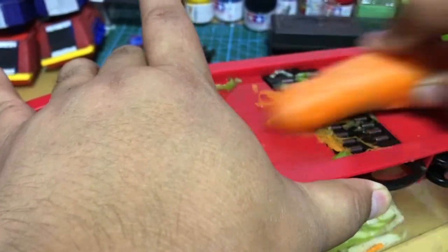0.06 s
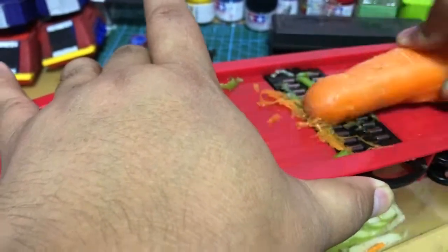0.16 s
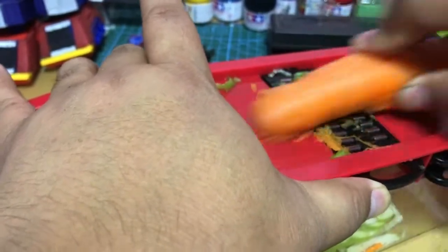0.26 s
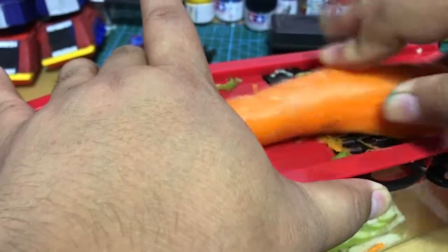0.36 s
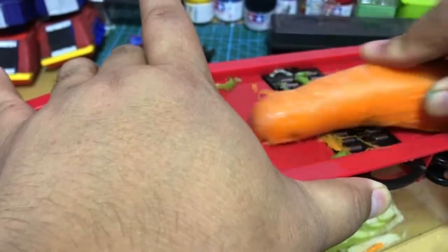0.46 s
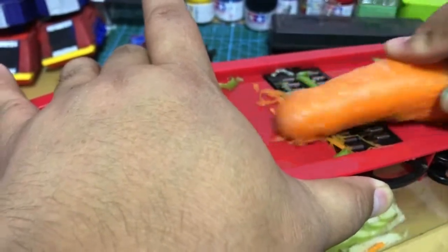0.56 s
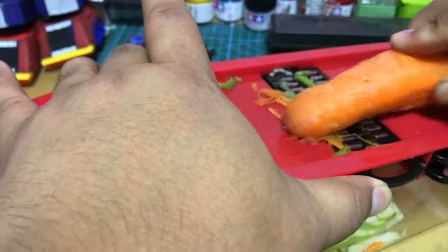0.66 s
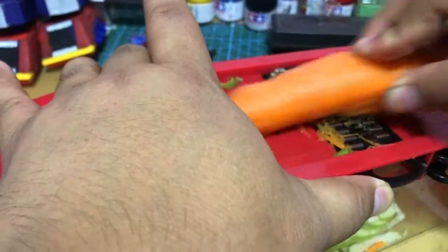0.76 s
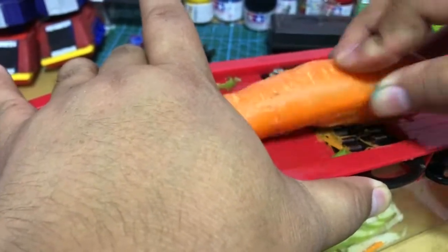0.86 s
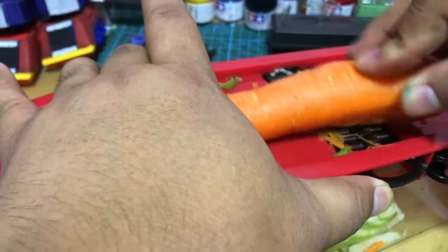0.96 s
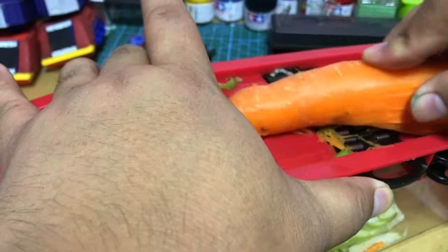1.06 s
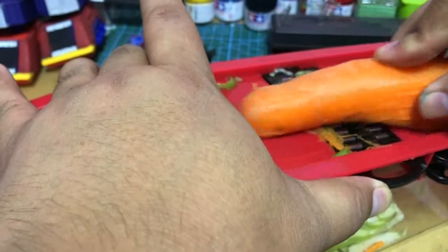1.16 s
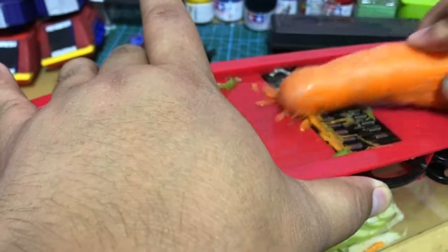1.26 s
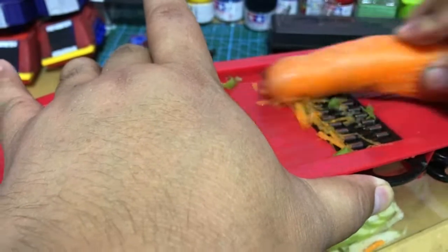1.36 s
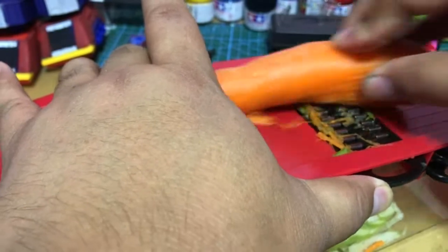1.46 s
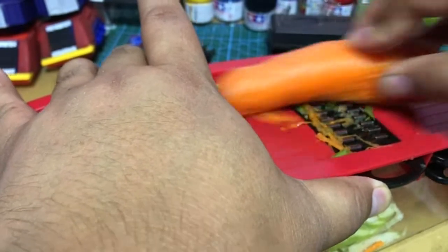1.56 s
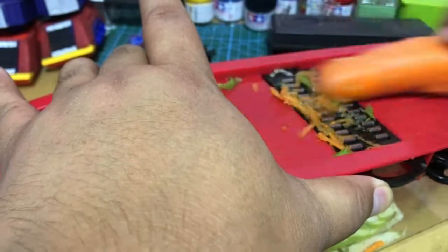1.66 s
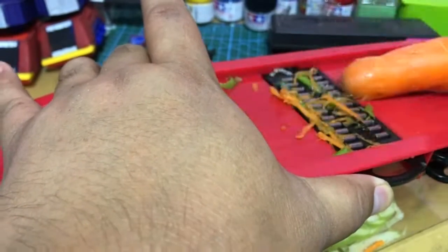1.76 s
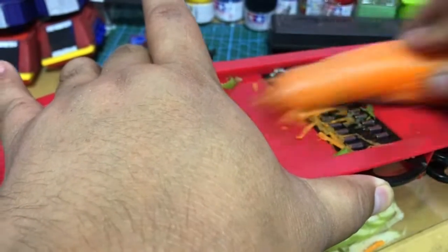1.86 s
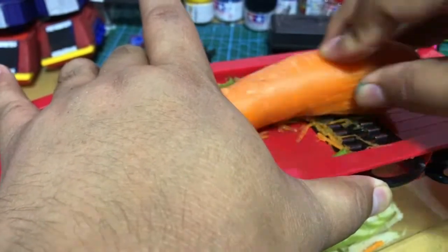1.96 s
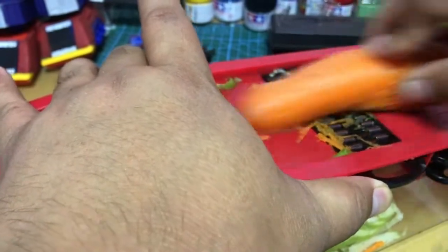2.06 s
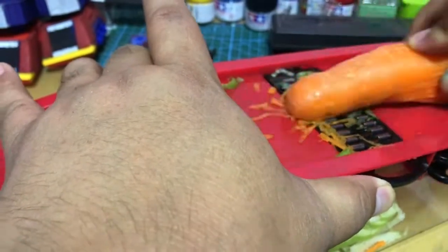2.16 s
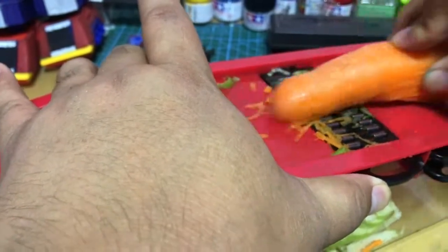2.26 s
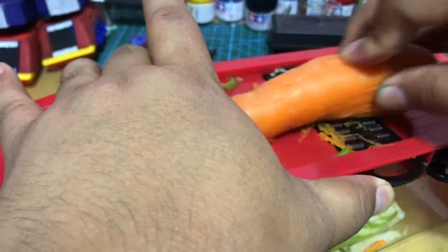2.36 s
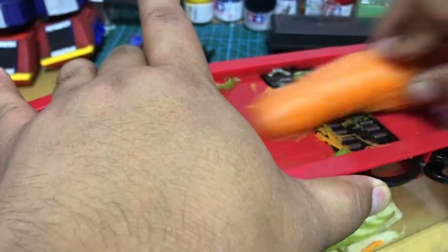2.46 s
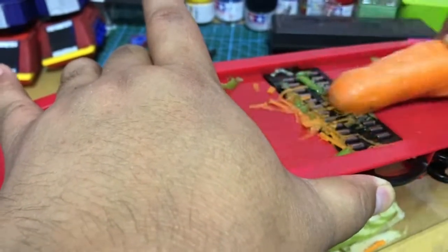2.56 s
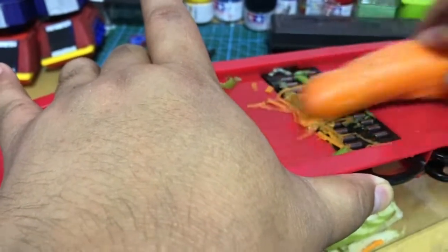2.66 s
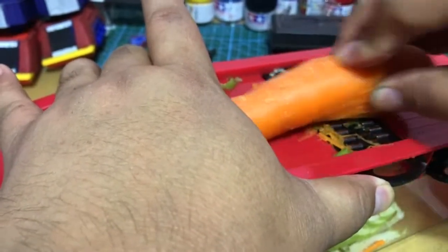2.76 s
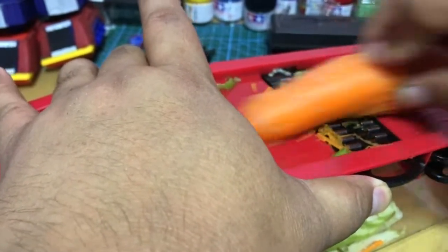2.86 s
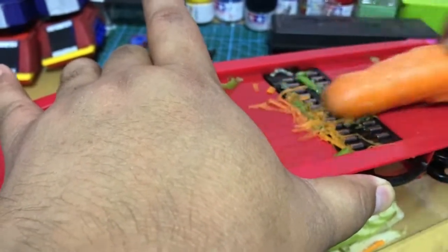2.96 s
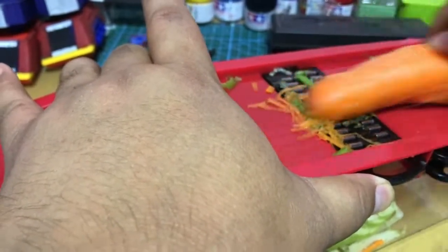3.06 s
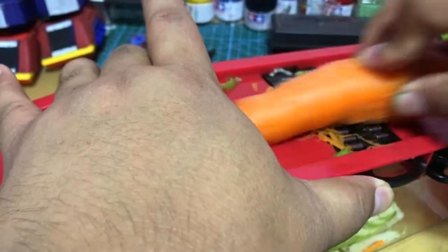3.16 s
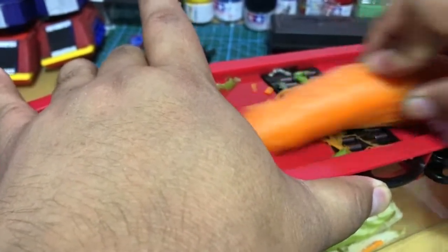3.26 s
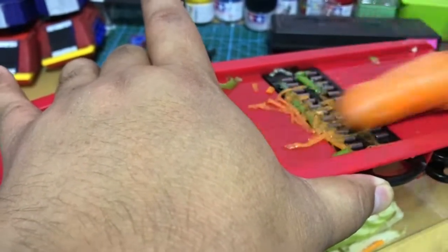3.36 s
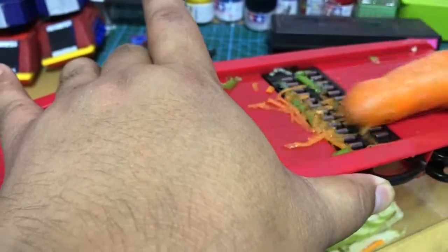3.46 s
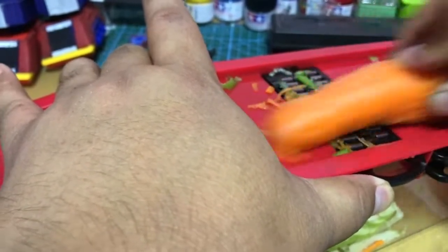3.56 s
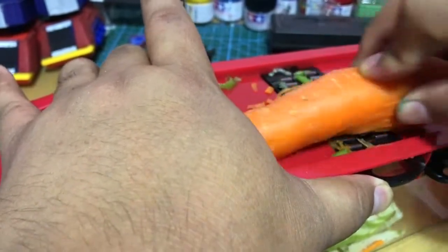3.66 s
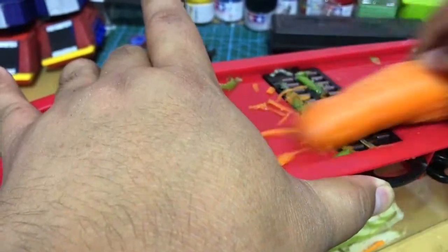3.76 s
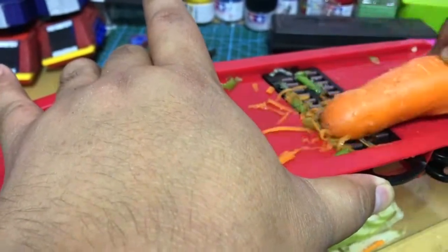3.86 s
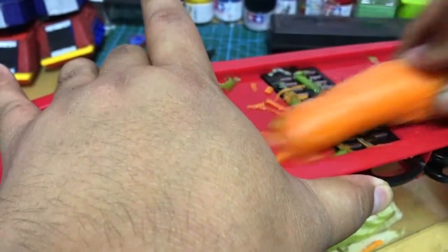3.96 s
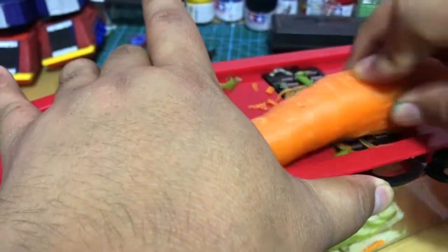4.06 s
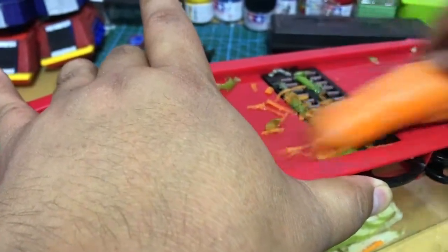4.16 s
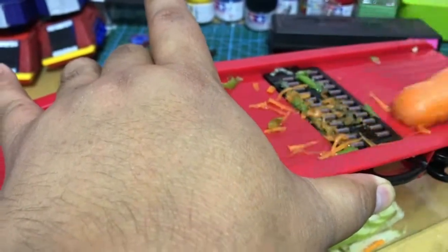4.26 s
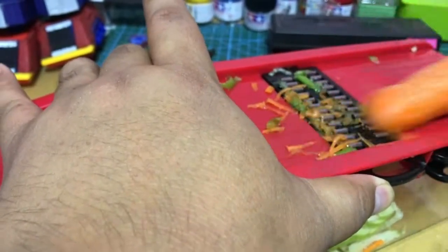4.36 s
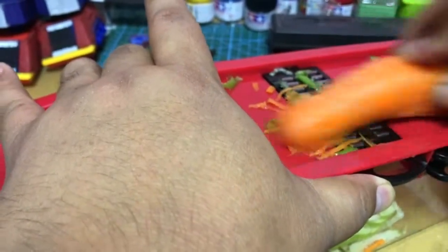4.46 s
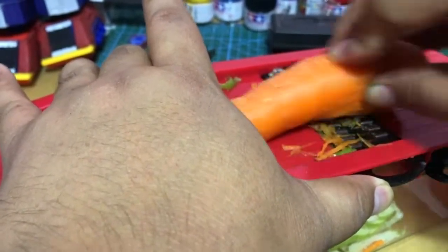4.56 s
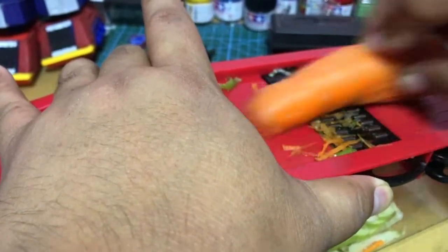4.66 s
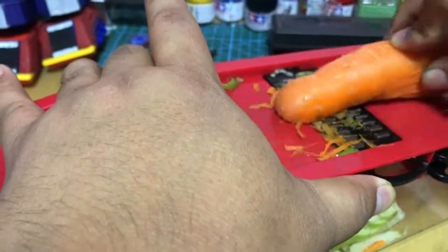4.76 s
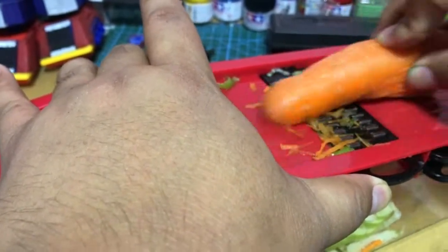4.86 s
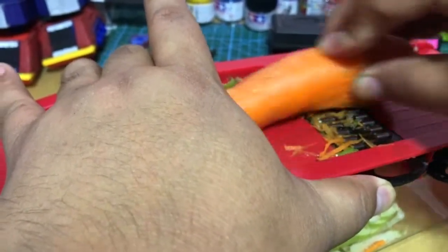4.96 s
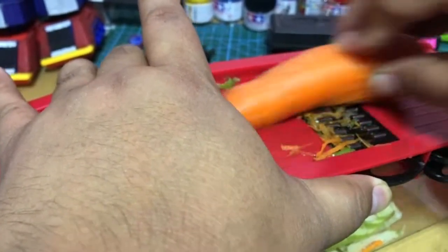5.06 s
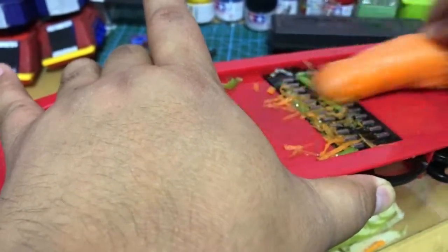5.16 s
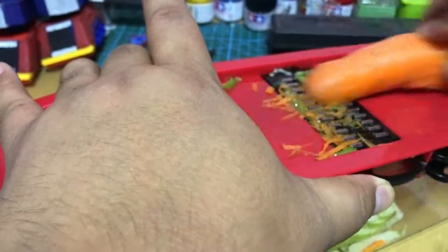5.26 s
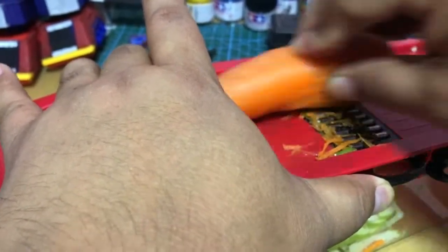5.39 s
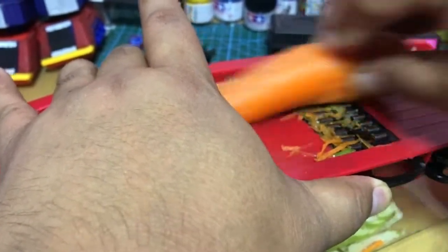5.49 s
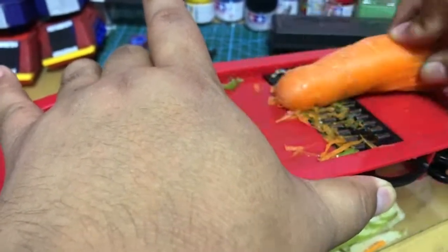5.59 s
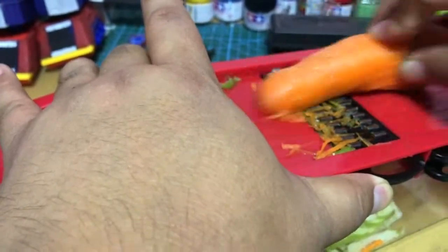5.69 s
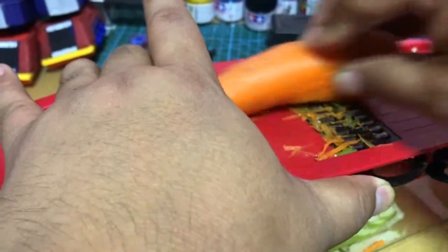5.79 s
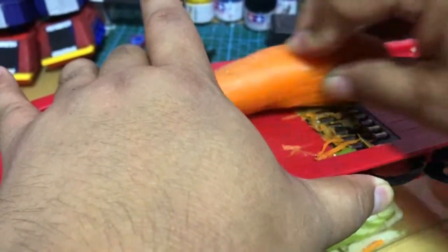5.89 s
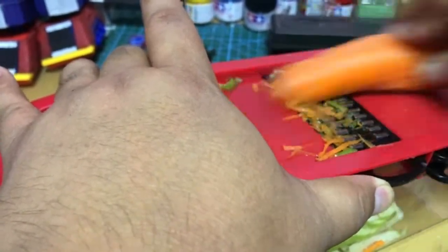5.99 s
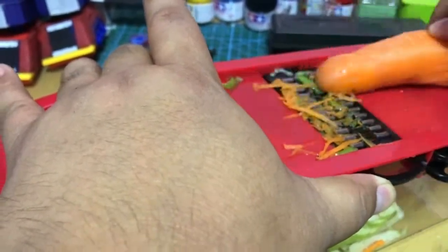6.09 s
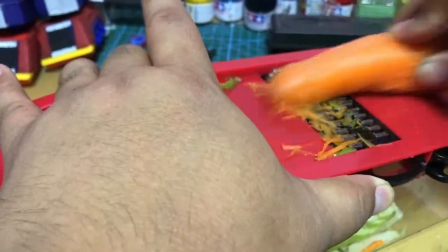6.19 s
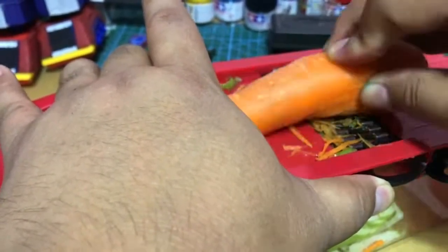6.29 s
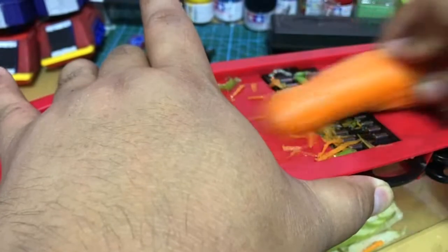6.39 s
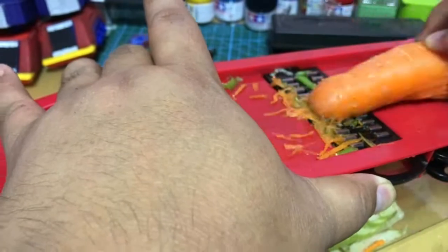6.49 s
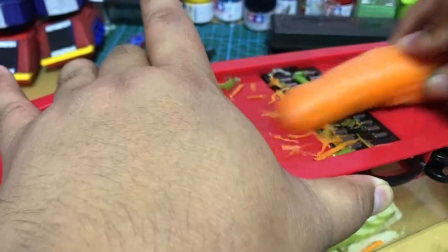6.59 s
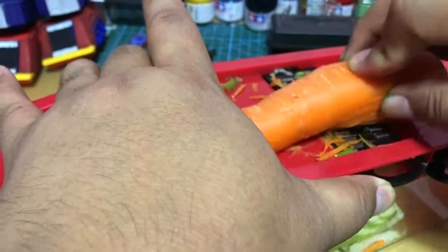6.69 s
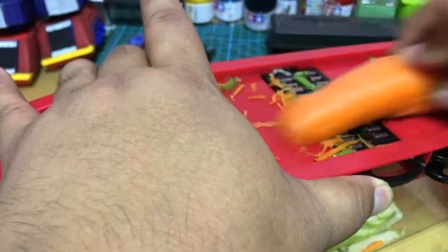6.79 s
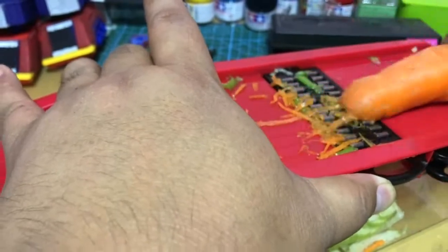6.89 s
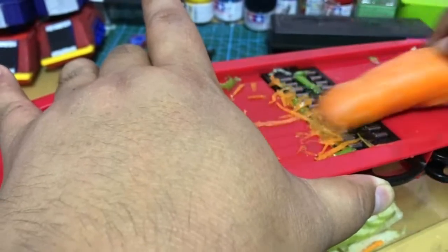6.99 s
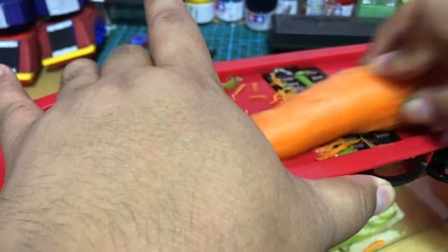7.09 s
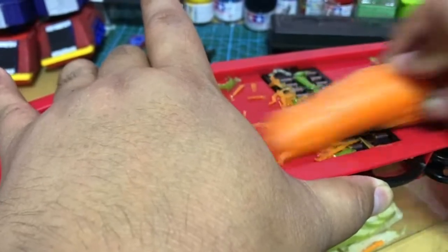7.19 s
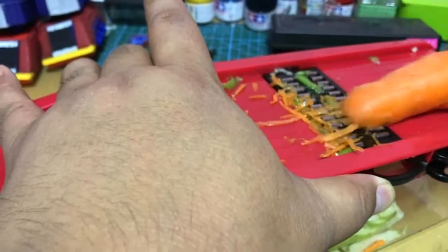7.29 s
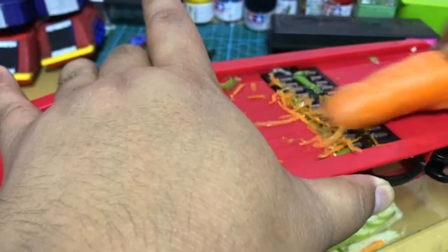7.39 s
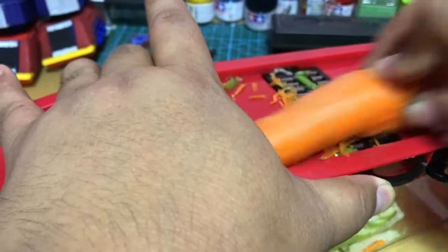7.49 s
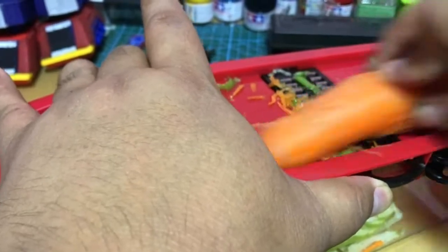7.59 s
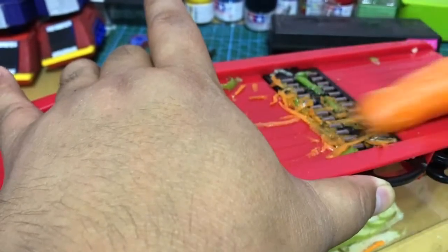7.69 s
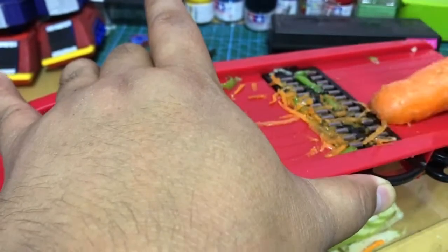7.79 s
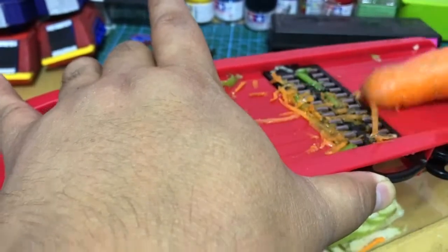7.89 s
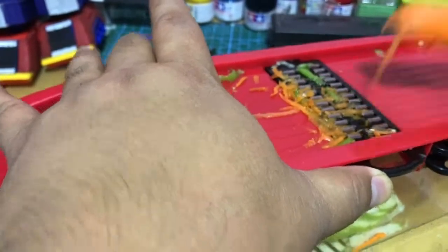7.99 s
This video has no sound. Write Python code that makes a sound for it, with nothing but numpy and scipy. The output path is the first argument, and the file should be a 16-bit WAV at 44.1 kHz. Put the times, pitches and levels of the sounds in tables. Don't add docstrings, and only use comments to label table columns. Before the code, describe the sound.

Close up in a small furnished room, a carrot shifts lightly on a plastic slicer board with small ticks and soft bumps. Then quick, regular grating begins, a little over two strokes a second: each forward stroke knocks, hisses and rasps through steel teeth, rattling the board, while lighter return strokes tick and the tray thumps. It ends with faint taps as the hand leaves.

```python
import sys
import numpy as np
from scipy import signal
from scipy.fft import rfft, irfft, next_fast_len
from scipy.io import wavfile
from scipy.ndimage import uniform_filter1d

SR = 44100
rng = np.random.default_rng(int(sys.argv[2]) if len(sys.argv) > 2 else 0)


def waveform_to_disk(signal):
    frames = np.transpose(np.atleast_2d(signal))
    scaled = np.clip(frames, -1, 1) * 32767
    samples = np.round(scaled).astype(np.int16)
    wavfile.write(sys.argv[1], SR, samples)


def gain_from_db(level_db):
    decades = np.asarray(level_db, float) / 20
    return 10 ** decades


N = 354563
TIME = np.arange(N) / SR


def unit(x):
    return x / np.sqrt(np.mean(x ** 2))


def shape(x, hz, db):
    size = next_fast_len(N)
    f = np.maximum(np.arange(size // 2 + 1) * SR / size, 1)
    gain = gain_from_db(np.interp(np.log(f), np.log(hz), db))
    return irfft(rfft(x, size) * gain, size)[..., :N]


def split(x, edge_hz):
    low = signal.sosfiltfilt(signal.butter(2, edge_hz, fs=SR, output="sos"), x)
    return low, x - low


def ring(x, modes, last=0.88):
    out = 0
    for k, (hz, db, t60) in enumerate(modes):
        pole = np.exp(2j * np.pi * hz / SR - np.log(1000) / (t60 * last * SR))
        out = out + (-1) ** k * gain_from_db(db) * signal.lfilter([1], [1, -pole], x).imag
    return out


def strike(events, modes, contact_s, last, vary_db):
    out = np.zeros(N + SR)
    blow = np.zeros(SR // 3)
    push = np.hanning(int(contact_s * SR) + 3)
    blow[:len(push)] = push / push.sum()
    places = rng.standard_normal((len(events), len(modes)))
    for (s, db, pitch), place in zip(events, places):
        woken = [(hz * pitch, g + vary_db * p, t60) for (hz, g, t60), p in zip(modes, place)]
        start = int(s * SR)
        out[start:start + len(blow)] += gain_from_db(db) * ring(blow, woken, last)
    return out[:N]


def grains(rate, spread_db, channels):
    hit = rng.random((channels, N)) < rate / SR
    size = gain_from_db(spread_db * rng.exponential(size=(channels, N)))
    return unit(hit * rng.standard_normal((channels, N)) * size)


def flutter(rate, depth_db):
    k = int(SR / rate)
    held = np.repeat(rng.standard_normal(N // k + 1), k)
    return gain_from_db(depth_db * uniform_filter1d(held, k)[:N])


def patchy(x, edges_hz, rate, depth_db):
    out = 0
    for edge_hz in edges_hz:
        low, x = split(x, edge_hz)
        out = out + low * flutter(rate, depth_db)
    return out + x * flutter(rate, depth_db)


def pair(x, apart=0, width=0):
    lag = int(0.00025 * SR)
    return np.array([x, np.roll(x, lag)]) + width * apart


# (frequency [Hz], left level [dB], right level [dB])
MIC_PORTS = [(877, 3.5, -1.5), (1510, -9, -8.5), (2540, -7.5, -11), (3180, -6, -8.5), (4830, -6, -12.5),
             (5850, -8, -11), (7170, -10.5, -7.5), (8100, -18.5, -11.5), (10300, -19.5, -7),
             (12300, -23.5, -11), (13850, -23.5, -14.5), (16000, -35.5, -19)]


def at_ports(x):
    hz, left_db, right_db = np.transpose(MIC_PORTS)
    return np.array([shape(x[0], hz, left_db), shape(x[1], hz, right_db)])


# (frequency [Hz], level [dB per Hz])
HUSH_SPECTRUM = [(24, -34), (40, -4), (202, -2), (342, -13), (509, -7), (838, -29), (949, -10), (1310, -37),
                 (15500, -35)]


def hush():
    return gain_from_db(-73) * unit(shape(rng.standard_normal((2, N)), *np.transpose(HUSH_SPECTRUM)))


def room(x):
    t60_s, top_t60_s, build_s, level_db = 0.3, 0.2, 0.011, -8.5
    age = TIME[:SR // 2]
    low, top = split(rng.standard_normal((2, len(age))), 13000)
    tail = low + top * gain_from_db(-60 * age / top_t60_s)
    tail = tail * gain_from_db(-60 * age / t60_s) * np.minimum(age / build_s, 1)
    tail = tail / np.sqrt(np.sum(tail ** 2, axis=1, keepdims=True))
    tail = split(tail, 150)[1]
    return gain_from_db(level_db) * signal.fftconvolve(x, tail, axes=1)[:, :N]


# (frequency [Hz], level [dB], decay t60 [s])
TRAY_MODES = [(108, 1.5, 0.24), (163.7, 0.5, 0.094), (86.3, -10, 0.46), (233, -7, 0.19),
              (308.6, -12.5, 0.34)]
# (time [s], peak level [dB], pitch [Hz])
TRAY_THUMPS = [(1.337, -38.5, 103), (1.387, -33.5, 117), (1.468, -34.5, 108), (1.549, -34, 101),
               (2.184, -39.5, 102), (2.37, -30, 112.4), (2.513, -39, 125), (2.93, -35.5, 151),
               (3.179, -38.5, 108), (3.871, -36, 95), (3.918, -35.5, 136), (4.045, -28.5, 110),
               (4.167, -35, 104), (4.238, -38.5, 103.4), (4.633, -36.5, 114), (4.732, -38, 141),
               (4.811, -36.5, 119), (5.016, -33, 111), (5.049, -30.5, 120), (5.184, -34, 124),
               (5.419, -41, 101.3), (5.462, -34.5, 116.3), (5.622, -35, 119), (5.912, -35.5, 114),
               (6.358, -38.5, 99.6), (6.675, -37.5, 109), (6.742, -37, 106.7), (7.07, -40, 107),
               (7.118, -32, 126.2), (7.177, -37, 108),
               (0.028, -32, 101), (0.26, -47, 108), (0.392, -35, 101), (0.469, -44, 97.5), (0.559, -51, 93),
               (0.614, -57, 95), (0.675, -38.5, 156.4), (0.833, -54, 87), (1.229, -45, 111),
               (1.71, -44.5, 104), (2.022, -42, 112.4), (2.726, -46, 108), (3.07, -37, 103),
               (3.495, -51.5, 95), (3.68, -46, 115), (3.759, -49.5, 102.5), (4.33, -38, 110),
               (6.026, -39, 127), (6.119, -40.5, 151), (6.54, -37, 100.4), (6.919, -55, 109),
               (7.409, -37, 124.7), (7.565, -52, 174), (7.718, -44, 171.6)]


def thumps():
    rows = [(s, db, hz / 110) for s, db, hz in TRAY_THUMPS]
    return pair(strike(rows, TRAY_MODES, contact_s=0.0047, last=0.77, vary_db=3.0))


# (frequency [Hz], level [dB], decay t60 [s])
BOARD_MODES = [(446.3, 2.5, 0.06), (512.8, -3.5, 0.14), (561, -1, 0.094), (665.3, -3.5, 0.11),
               (386, -5, 0.01), (756, -14.5, 0.13), (927, -2.5, 0.039), (1018, -9, 0.086),
               (1066, -7.5, 0.03), (1322, -11.5, 0.035)]
# (time [s], peak level [dB], hardness [dB], pitch [Hz])
BOARD_KNOCKS = [(0.252, -56, -16, 570), (0.399, -43, -11, 446), (0.469, -45, -11, 432),
                (0.692, -36.5, -9.5, 513), (0.895, -42, -17, 547), (1.063, -43.5, -44, 490),
                (1.211, -41.5, -24, 486), (1.389, -36, -9.5, 490), (1.697, -46.5, 0, 470),
                (1.744, -31.5, -16, 440), (1.987, -38, -34, 622), (2.58, -35, -8, 570),
                (3.452, -25, -28, 537), (3.918, -17, -8, 483), (3.944, -24, -21, 507),
                (4.121, -32.5, -15.5, 540), (4.364, -46, -27, 473), (4.284, -37.5, -11, 490),
                (4.514, -43.5, -26, 398), (5.187, -29, -13, 507), (5.432, -34, -19, 440),
                (5.647, -26, -17, 460), (5.924, -30, -17, 446), (6.347, -35, -36, 468),
                (7.326, -49, -2, 456), (7.57, -52, -22, 488), (7.66, -52, -41, 483), (7.719, -44, -10, 442),
                (7.765, -42.5, -36, 496), (7.956, -45.5, -17, 647)]


def knocks():
    landings = [(row[0], row[4], -18, 491) for row in CUT_STROKES]
    turns = [(row[0], row[4], -8.5, 482) for row in RETURN_STROKES]
    blows = BOARD_KNOCKS + landings + turns
    soft_rows = [(s, db, 1) for s, db, _, _ in blows]
    spot_rows = [(s, db, hz / 550) for s, db, _, hz in blows]
    hard_rows = [(s, db + hard_db, 1) for s, db, hard_db, _ in blows]
    soft = strike(soft_rows, BOARD_MODES[:5], contact_s=0.00052, last=1.0, vary_db=-1.5)
    spot = strike(spot_rows, [(563.0, 0.0044, 0.075)], contact_s=0.0014, last=1, vary_db=1.5)
    hard = strike(hard_rows, BOARD_MODES[5:], contact_s=0.0004, last=0.68, vary_db=5)
    return pair(gain_from_db(-14.5) * soft + gain_from_db(-3.0) * spot + gain_from_db(8.5) * hard)


# (frequency [Hz], level [dB], decay t60 [s])
TOOTH_MODES = [(2257, -10.5, 0.09), (2244, 1.5, 0.027), (3048, -10.5, 0.22), (4333, 6.5, 0.028),
               (4510, 0.5, 0.021), (5310, -1, 0.11), (7100, -10, 0.057), (7660, 5.5, 0.11),
               (9400, 1, 0.071), (9850, -5, 0.08), (12500, -1, 0.14)]
# (time [s], peak level [dB], top end level [dB])
FIBRE_TICKS = [(0.024, -38.5, -25), (0.113, -37, -13), (0.172, -36.5, -3), (0.3368, -48, -1.5),
               (0.5393, -49, 3.5), (0.608, -46.5, 4.5), (0.696, -40.5, -37), (0.873, -54, -16),
               (0.897, -42, -5), (1.208, -45.5, -13), (1.306, -37, 5.5), (1.458, -41.5, -6),
               (1.686, -40, -12.5), (1.9146, -39, -9), (2.551, -32.5, -24), (3.3333, -47, -16),
               (4.025, -40, -5), (5.887, -50, -2), (6.673, -50, -15), (7.672, -45, -14)]
# (time [s], peak level [dB])
SHRED_SNAGS = [(1.558, -36.5), (2.028, -48), (2.434, -40), (2.8592, -36), (3.371, -43.5), (3.686, -51),
               (4.082, -48.5), (5.071, -43), (5.475, -44.5), (5.9313, -39), (6.354, -46), (6.7344, -39.5),
               (7.145, -42)]


def ticks():
    decay_s, rise_s, ring_db = 0.012, 0.006, -33
    bite_db, bite_top_db, snag_top_db = 0.5, -15, 6
    out = np.zeros((2, N + SR))
    age = TIME[:SR // 6]
    envelope = np.exp(-age / decay_s) * np.minimum(age / rise_s, 1)
    bites = [(s, cut_db + swell_db(run_s) + bite_db, bite_top_db) for s, run_s, cut_db, _, _ in CUT_STROKES]
    snags = [(s, db, snag_top_db) for s, db in SHRED_SNAGS]
    for s, db, top_db in FIBRE_TICKS + bites + snags:
        low, high = split(rng.standard_normal((2, len(age))), 6500)
        struck = gain_from_db(db) * envelope * (low + gain_from_db(top_db) * high)
        chance = rng.standard_normal((len(TOOTH_MODES), 2))
        teeth = [(hz * (1 + 0.06 * a), g + 2.5 * b, t60)
                 for (hz, g, t60), (a, b) in zip(TOOTH_MODES, chance)]
        start = int(s * SR)
        out[:, start:start + len(age)] += struck + gain_from_db(ring_db) * ring(struck, teeth, last=0.3)
    return gain_from_db(10.5) * at_ports(split(out[:, :N], 1800)[1])


def swell_db(early_s):
    return -9 * (10 * early_s) ** 1.53


def arc(start_s, length_s, bend):
    grip_db, share, end_db = bend
    let_go_db_per_s = 395.5
    s = start_s + np.array([0, share * length_s, length_s, length_s + 1])
    return np.interp(TIME, s, [grip_db, 0, end_db, end_db - let_go_db_per_s])


# (landing time [s], run-up to the fastest point [s], cutting level [dB],
# board drag level [dB], landing knock level [dB])
CUT_STROKES = [(1.281, 0.07, -45.5, -42, -38), (1.733, 0.042, -42, -37, -43),
               (2.135, 0.072, -44, -39, -35.5), (2.516, 0.11, -44, -40, -38.5),
               (2.937, 0.094, -42, -38.5, -28), (3.394, 0.073, -43.5, -40, -37),
               (3.801, 0.075, -42, -38, -49.5), (4.31, 0.06, -42.5, -41, -44),
               (4.734, .08, -41.5, -35, -34), (5.134, 0.11, -41.5, -37, -46),
               (5.57, 0.12, -39.5, -36.5, -52), (6.051, 0.077, -42.5, -40, -38.5),
               (6.451, 0.065, -41, -38, -39), (6.874, 0.068, -40.5, -37, -50.5),
               (7.289, 0.076, -44, -39.5, -45)]
# (start time [s], length [s], cutting level [dB],
# board drag level [dB], turning knock level [dB])
RETURN_STROKES = [(1.467, 0.24, -52, -41, -45), (1.913, 0.22, -58, -46.5, -43),
                  (2.335, 0.16, -50, -43, -55), (2.743, 0.18, -52.5, -44, -55),
                  (3.167, 0.16, -58, -44.5, -53), (3.599, 0.18, -56.5, -45, -59),
                  (4.043, 0.25, -55, -42.5, -34), (4.579, 0.11, -54, -44.5, -57.5),
                  (4.95, 0.18, -50.5, -42.5, -43), (5.379, 0.19, -52, -44, -41),
                  (5.884, 0.11, -48.5, -40.5, -42), (6.248, 0.17, -53, -42, -59),
                  (6.671, 0.16, -55, -44.5, -45), (7.093, 0.14, -54.5, -41, -57)]
# (start time [s], length [s], cutting level [dB],
# board drag level [dB], brightness [dB])
CARROT_SHIFTS = [(0, 0.14, -52.5, -44, -11), (0.105, 0.21, -53.5, -48, -7.5), (0.377, .08, -64.5, -53, -10),
                 (0.533, 0.11, -60.5, -63.5, -19), (.685, 0.072, -57.5, -47, -14),
                 (0.873, 0.13, -68.5, -55, -1.5), (1.057, 0.19, -79.5, -61.5, 3),
                 (1.203, 0.17, -60.5, -56, -5), (7.484, 0.11, -77, -66, 0), (7.684, 0.1, -67.5, -65, -7.5),
                 (7.924, 0.08, -92, -70, -7)]


def hand():
    rest_cut_db, rest_drag_db, rest_bright_db, lifted_db = -67, -67.5, -5.5, -87.5
    cut_bright_db, return_bright_db = (-12.5, -2, -4.5), -8
    return_arc, shift_arc = (-7, 0.47, -10), (-2.5, 0.26, -10)
    board_depth, tray_depth = 1.97, 0.59
    rumble_db, grip_s = -5, 0.018
    resting = uniform_filter1d(1. * (TIME > 1.25) * (TIME < 7.5), size=2000)
    cut_db = lifted_db + (rest_cut_db - lifted_db) * resting
    board_db = lifted_db + (rest_drag_db - lifted_db) * resting
    tray_db, bright_db = board_db, np.full(N, rest_bright_db)
    strokes = []
    for s, run_s, peak_db, drag_db, _ in CUT_STROKES:
        late = TIME - s - run_s
        fade_db = -18.5 * (10 * np.maximum(late, 0)) ** 1.36
        speed_db = swell_db(np.maximum(-late, 0)) + fade_db
        tone_db = np.interp(10 * late, [-1, 0, 1], cut_bright_db)
        strokes.append((s, speed_db, peak_db, drag_db, tone_db))
    for s, length_s, peak_db, drag_db, _ in RETURN_STROKES:
        strokes.append((s, arc(s, length_s, return_arc), peak_db, drag_db, return_bright_db))
    for s, length_s, peak_db, drag_db, tone_db in CARROT_SHIFTS:
        strokes.append((s, arc(s, length_s, shift_arc), peak_db, drag_db, tone_db))
    for s, speed_db, peak_db, drag_db, tone_db in strokes:
        speed_db = speed_db + 20 * np.minimum(TIME - s, 0) / grip_s
        bright_db = np.where(peak_db + speed_db > cut_db, tone_db, bright_db)
        cut_db = np.maximum(cut_db, peak_db + speed_db)
        board_db = np.maximum(board_db, drag_db + board_depth * speed_db)
        tray_db = np.maximum(tray_db, drag_db + rumble_db + tray_depth * speed_db)
    return cut_db, uniform_filter1d(bright_db, size=600), board_db, tray_db


def drag(board_db, tray_db):
    slips = grains(rate=800, spread_db=0.2, channels=3) * gain_from_db(board_db - 27)
    board = pair(ring(slips[0], BOARD_MODES), ring(slips[1:], BOARD_MODES[2:]), 0.33)
    shoves = grains(rate=300, spread_db=0.96, channels=3) * gain_from_db(tray_db - 32)
    tray = pair(ring(shoves[0], TRAY_MODES), ring(shoves[1:], TRAY_MODES[3:]), 0.4)
    return board + tray


def rasp(cut_db, bright_db):
    tears = grains(rate=12000, spread_db=0.86, channels=3)
    tears = pair(0.34 * tears[0], tears[1:], 0.81)
    steel = unit(tears) + gain_from_db(-17) * unit(ring(tears, TOOTH_MODES, last=0.4))
    edges_hz = (1500, 2100, 2800, 3600, 4600, 5800, 7300, 9200, 11500)
    heard = patchy(at_ports(steel), edges_hz, rate=22, depth_db=3.9)
    low, high = split(unit(split(heard, 993)[1]), 4100)
    pressure = gain_from_db(cut_db + 4.0) * flutter(rate=30, depth_db=1.65)
    return pressure * (low + gain_from_db(bright_db + 4.0) * high)


def scene():
    cut_db, bright_db, board_db, tray_db = hand()
    near = thumps() + knocks() + ticks()
    near = near + drag(board_db, tray_db) + rasp(cut_db, bright_db)
    return near + room(near)


# (edge frequency [Hz], level under which all above the edge is muted [dB])
TREBLE_GATES = [(12600, -85), (13800, -81), (14700, -76), (15200, -72)]


def mute_weak_top(x):
    for edge_hz, floor_db in TREBLE_GATES:
        highpass = signal.ellip(6, 0.1, 60, edge_hz, "high", fs=SR, output="sos")
        top = signal.sosfiltfilt(highpass, x)
        power = uniform_filter1d(np.mean(top ** 2, axis=0), size=2048)
        faint = uniform_filter1d(1. * (power < gain_from_db(floor_db) ** 2), size=512)
        x = x - faint * top
    return x


def top_cut(x):
    return signal.sosfilt(signal.butter(12, 15750, fs=SR, output="sos"), x)


def record(dry):
    thin = signal.sosfilt(signal.butter(3, 66, "high", fs=SR, output="sos"), dry)
    thin = mute_weak_top(thin) + hush()
    mix = signal.sosfilt(signal.ellip(10, 0.2, 80, 15550, fs=SR, output="sos"), thin)
    return top_cut(mix)


dry = scene()
out = record(dry)
waveform_to_disk(out)
```